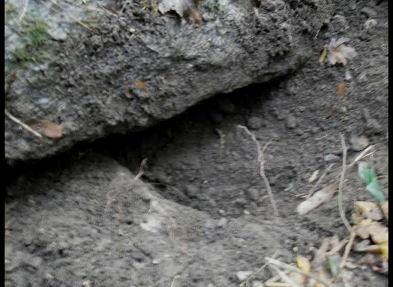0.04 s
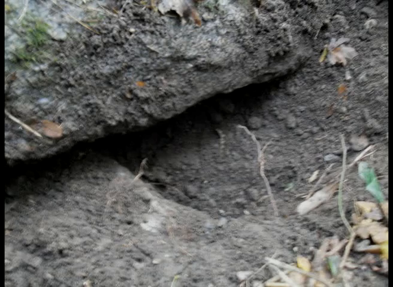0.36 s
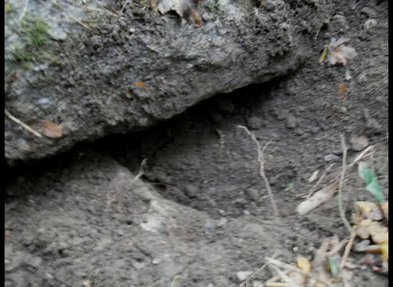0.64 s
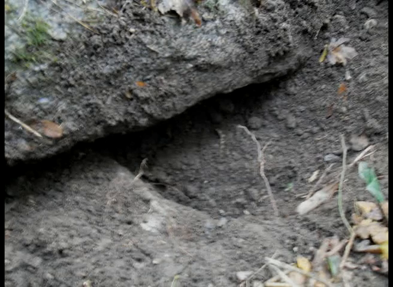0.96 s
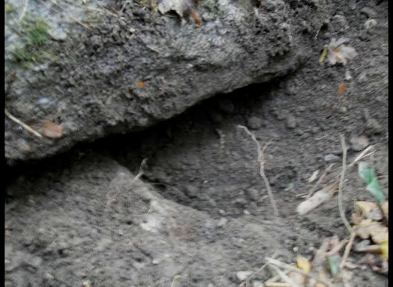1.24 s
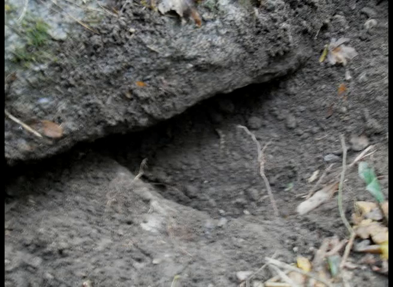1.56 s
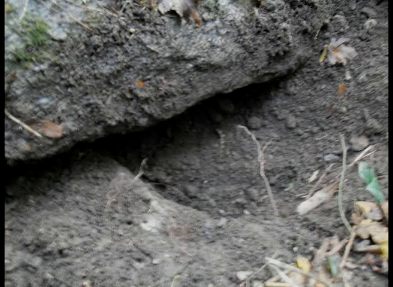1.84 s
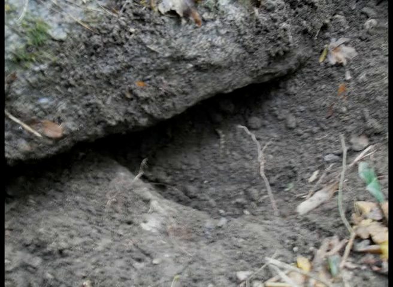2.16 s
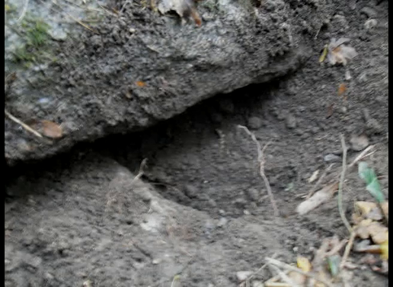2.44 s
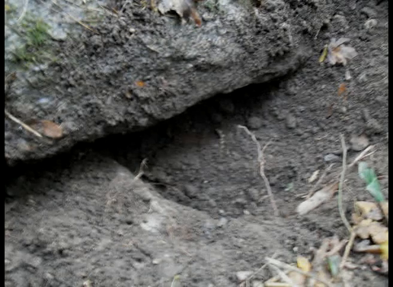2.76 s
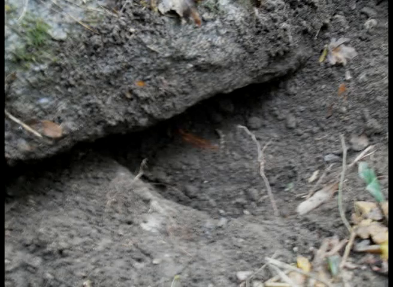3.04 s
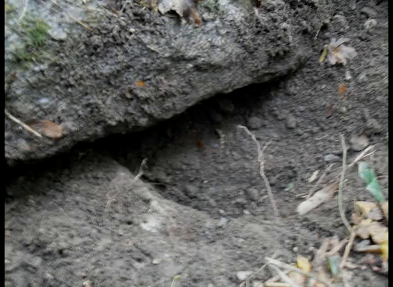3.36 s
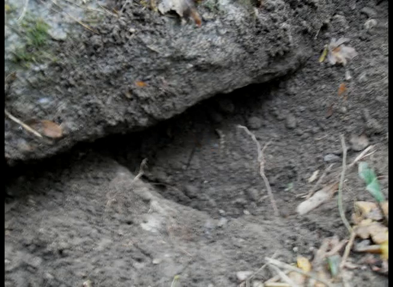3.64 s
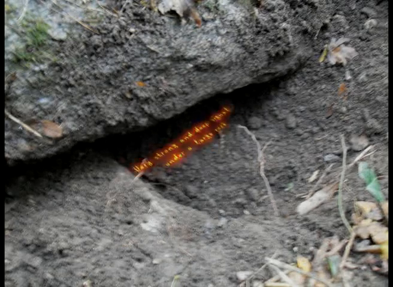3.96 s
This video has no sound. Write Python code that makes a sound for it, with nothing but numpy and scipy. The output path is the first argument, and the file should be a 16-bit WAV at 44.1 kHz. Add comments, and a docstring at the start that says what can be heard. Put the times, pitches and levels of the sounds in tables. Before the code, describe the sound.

Quiet hiss and small ticks, then a close insect's raspy buzz climbs in pitch.

```python
"""Outdoors, by a hole under a rock: soft hiss, faint scuffing, small ticks and a few far bird notes.
Near 3 s a loud, creaky buzz sets in close by, the way a dry contact sticks and slips. Each slip is an
impulse that rings one small, hard body near 3.3 kHz. The resonances stay put while the pulse rate
climbs, so separate double clicks merge into a rasp and then into a thin, rising whine."""
import sys
import numpy as np
from scipy import signal
from scipy.fft import rfft, irfft, next_fast_len
from scipy.io import wavfile
from scipy.ndimage import map_coordinates

SR = 44100
rng = np.random.default_rng(int(sys.argv[2]) if len(sys.argv) > 2 else 0)


def unload_wav(signal):
    """Save mono or channel-first audio to the path in sys.argv[1] as 16-bit WAV at rate SR, clipped to [-1, 1]."""
    wavfile.write(
        sys.argv[1],
        SR,
        np.round(np.clip(np.atleast_2d(signal).T, -1, 1) * 32767).astype(np.int16),
    )


N = 176400
TIME = np.arange(N) / SR


def amp(db):
    """Amplitude ratio of a level in decibels."""
    return 10 ** (np.asarray(db) / 20)


def unit(x):
    """Normalisation to unit RMS."""
    return x / np.sqrt(np.mean(x ** 2) + 1e-20)


def along(points, hz):
    """Interpolation of (f/Hz, value) points on a logarithmic frequency axis."""
    f, values = np.transpose(points)
    return np.interp(np.log(hz + 1), np.log(f + 1), values)


def curves(rows):
    """Linear interpolation in time: one curve for each column after t/s."""
    times, *columns = np.transpose(rows)
    return [np.interp(TIME, times, column) for column in columns]


def wobble(knots_per_s):
    """Smooth random modulation: a spline through Gaussian values."""
    knots = rng.standard_normal(int(N * knots_per_s / SR) + 4)
    return map_coordinates(knots, [TIME * knots_per_s])


def arch(start, length):
    """Envelope of one rounded rise and fall: the square root of a half sine."""
    progress = np.clip((TIME - start) / length, 0, 1)
    return np.sqrt(np.abs(np.sin(np.pi * progress)))


def coloured(x, spectrum, size=8192):
    """Minimum-phase filtering at unit energy; folding the cepstrum makes the response causal."""
    cepstrum = irfft(np.log(amp(along(spectrum, np.fft.rfftfreq(size, 1 / SR)))))
    cepstrum[1:size // 2] *= 2
    cepstrum[size // 2 + 1:] = 0
    response = irfft(np.exp(rfft(cepstrum)))
    return signal.fftconvolve(x, response / np.linalg.norm(response))[:N]


def pulses(times, sizes, order=8):
    """Band-limited impulses: windowed sincs place them between samples."""
    at = times[:, None] * SR
    taps = np.floor(at).astype(int) + np.arange(1 - order, order + 1)
    shape = np.sinc(taps - at) * np.cos(np.pi * (taps - at) / (2 * order)) ** 2
    return np.bincount(np.clip(taps, 0, N).ravel(), (sizes[:, None] * shape).ravel(), N + 1)[:N]


def reverberation(x, t60):
    """Diffuse field: convolution with exponentially decaying noise of unit energy."""
    t = TIME[:SR // 2]
    tail = rng.standard_normal(len(t)) * amp(-60 * t / t60)
    return signal.fftconvolve(x, tail / np.linalg.norm(tail))[:N]


def grains(spectrum, per_s=2500, spread_db=1.5):
    """Shot noise: dense, independent impacts of dry grains of uneven size."""
    hits = (rng.random(N) < per_s / SR) * rng.standard_normal(N)
    hits *= amp(spread_db * rng.standard_normal(N))
    return unit(coloured(hits, spectrum))


def air():
    """Filtered Gaussian noise: a nearly steady outdoor hiss."""
    # spectrum of the hiss: f/Hz, relative level/dB
    spectrum = [(25, -17.5), (60, -17), (100, -12.5), (170, -6), (300, -2), (500, -2.5), (850, -3),
                (1300, -4), (1700, -6.5), (2300, -8), (3200, -3.5), (4000, -5.5), (4600, -11.5),
                (6000, -10), (8000, -13), (10000, -16), (12000, -53)]
    level_db = -51.5 + 0.3 * wobble(14)
    return amp(level_db) * unit(coloured(rng.standard_normal(N), spectrum))


def birds(roughness=0.028):
    """Frequency-modulated tones: thin sliding notes, blurred by the reverberation of the woods."""
    # far bird notes: t/s, duration/s, start f/Hz, end f/Hz, direct peak level/dB
    notes = [(.335, 0.031, 4100, 3230, -56), (0.381, 0.029, 2920, 3210, -63),
             (0.516, 0.042, 4100, 4040, -54), (0.905, 0.052, 4120, 3980, -56),
             (1.111, .05, 3060, 3150, -62), (1.274, 0.096, 3190, 2944, -49.5),
             (1.368, 0.064, 3540, 3370, -53), (1.41, 0.076, 3160, 3100, -55),
             (1.659, 0.068, 3100, 3026, -49)]
    direct = np.zeros(N)
    for start, length, start_hz, end_hz, db in notes:
        glide_hz = np.interp(TIME, [start, start + length], [start_hz, end_hz])
        hz = glide_hz * (1 + roughness * wobble(400))
        direct += amp(db) * arch(start, length) * np.sin(2 * np.pi * np.cumsum(hz) / SR)
    return direct + amp(4) * reverberation(direct, t60=0.24)


def scuffing():
    """Granular friction: bright grit under a slowly changing pressure, and dull shuffles on soil."""
    # envelope of the grit: t/s, level/dB
    scuff = [(.05, -55.5), (.18, -48.5), (.23, -62.5), (.95, -84), (1.04, -53), (1.1, -60), (1.66, -58.5),
             (1.712, -42.5), (1.76, -51), (1.92, -56.5), (2.06, -46.5), (2.14, -53), (2.27, -49.5),
             (2.44, -49), (2.49, -45.5), (2.55, -47.5), (2.67, -48), (2.86, -63.5), (2.96, -44.5)]
    # soft shuffles: t/s, duration/s, greatest level/dB
    shuffles = [(.05, 0.18, -54.5), (0.46, 0.08, -61), (1.025, 0.092, -66.5), (1.28, 0.086, -66.5),
                (1.986, .14, -59), (2.42, 0.26, -65.5)]
    # spectra of grit and soil: f/Hz, relative level/dB
    grit = [(100, -21), (400, -11.5), (900, -7.5), (1200, -3), (1600, -6.5), (2000, -2), (2500, -8.5),
            (3100, 2.5), (3800, -2.5), (4600, -16.5), (5800, -4.5), (7300, -22), (10000, -15)]
    soil = [(100, -13.5), (400, -8.5), (780, 10), (1000, -17), (1200, 7), (1700, -17), (4000, -34.5)]
    grit_db, = curves(scuff)
    shuffling = sum(amp(db) * arch(start, length) for start, length, db in shuffles)
    return amp(grit_db) * grains(grit) + shuffling * grains(soil)


def ticks(snap=4.8):
    """Band-limited transients: each is the snap of first contact and an exponentially dying crumble."""
    # small ticks: t/s, peak level/dB, centre f/Hz, half-width/octaves, T60/s
    contacts = [(.075, -39.5, 850, 0.77, 0.06), (.124, -37, 3000, 1.4, .02),
                (.157, -29.5, 3300, 2.2, 0.018), (.175, -32, 1500, 1.6, 0.016),
                (0.206, -27, 3670, 1.6, 0.019), (0.3052, -31, 1490, 0.65, .016),
                (0.4, -39, 1710, 0.84, 0.013), (1.041, -31, 2850, 1.07, 0.022),
                (1.171, -23.5, 1850, 1.02, 0.0062), (1.222, -33.5, 3140, 0.58, 0.013),
                (1.87, -28, 2900, 1.8, 0.015), (2.057, -28, 3430, 0.78, 0.03),
                (2.063, -28.5, 3450, 0.36, .022), (2.225, -40, 467, 0.83, 0.023),
                (2.389, -32.5, 2100, 0.7, 0.024), (2.477, -25, 2470, 0.64, 0.023),
                (2.573, -36, 2680, 1, 0.0094), (2.801, -27.5, 1660, 0.55, 0.0096),
                (3.274, -28.5, 7960, 0.51, 0.0038), (3.3796, -15, 6400, 0.37, 0.0026),
                (3.54, -30.5, 1050, 0.7, 0.012), (3.614, -25.5, 9160, 0.37, 0.0089)]
    out, t = np.zeros(N + SR), TIME[:SR // 20]
    f = np.geomspace(20, SR / 2, 80)
    for start, db, hz, octaves, t60 in contacts:
        band_db = -20 * np.log10(1 + (np.log2(f / hz) / octaves) ** 4)
        push = (rng.standard_normal(len(t)) + snap * (t == 0)) * amp(-60 * t / t60)
        burst = coloured(push, np.column_stack([f, band_db]))
        out[round(start * SR):][:len(burst)] += amp(db) * burst / np.abs(burst).max()
    return out[:N]


def squeak(roughness=0.031):
    """Random frequency modulation roughens a brief upward glide on top of the buzz."""
    # course of the squeak: t/s, f/Hz, level/dB
    glide = [(3.82, 1080, -53), (3.827, 1205, -38), (3.838, 1776, -33), (3.845, 1840, -38),
             (3.852, 1670, -46), (3.859, 1990, -30), (3.866, 2250, -60)]
    hz, db = curves(glide)
    phase = 2 * np.pi * np.cumsum(hz * (1 + roughness * wobble(830))) / SR
    sounding = (TIME > glide[0][0]) & (TIME < glide[-1][0])
    return sounding * amp(db) * unit(np.sin(phase))


def stick_slip(waver=0.007, flutter_db=1, scatter_db=1.2, friction_db=-13):
    """Relaxation oscillation: slip pulses, paired and uneven when slow, single and regular when fast."""
    # rate of slipping: t/s, f/Hz
    slip_rate = [(2.9705, 30.27), (2.99, 98.1), (3.02, 115.6), (3.065, 153.7), (3.095, 148.2),
                 (3.12, 119.8), (3.17, 124.5), (3.2, 149), (3.24, 207.9), (3.275, 299.3), (3.3, 385.3),
                 (3.32, 440.2), (3.342, 444), (3.358, 465.9), (3.37, 445), (3.386, 440.2), (3.402, 423.6),
                 (3.423, 409), (3.44, 393.2), (3.47, 394.6), (3.49, 364), (3.52, 360.1), (3.55, 402.8),
                 (3.58, 459), (3.6, 503.7), (3.622, 559), (3.64, 649), (3.675, 684), (3.69, 660),
                 (3.71, 668.5), (3.725, 657), (3.78, 663), (3.815, 692), (3.84, 727), (3.862, 767),
                 (3.882, 772), (3.893, 809.6), (3.912, 840), (3.96, 1012), (4, 1019)]
    # strength of the drive: t/s, level/dB
    force = [(2.97, -36.5), (3.11, -36), (3.17, -38.5), (3.29, -33.5), (3.33, -34), (3.355, -32.5),
             (3.385, -37.5), (3.41, -34.5), (3.465, -35), (3.55, -33), (3.61, -34), (3.65, -34),
             (3.73, -36.5), (3.81, -33), (3.83, -33), (3.865, -31.5), (3.886, -38), (3.905, -36),
             (3.925, -35.5), (3.95, -33), (4, -30.5)]
    # timing scatter against slip rate: f/Hz, standard deviation/periods
    jitter = [(60, 0.027), (200, .035), (310, 0.028), (390, 0.011), (650, 0.0029), (1000, 0.0055)]
    rate_hz, = curves(slip_rate)
    force_db = curves(force)[0] + flutter_db * wobble(44.8)
    sliding = TIME >= slip_rate[0][0]
    cycles = np.cumsum(sliding * rate_hz * (1 + waver * wobble(170))) / SR
    times = np.interp(np.arange(int(cycles[-1]) + 1), cycles[sliding], TIME[sliding])  # one slip a cycle
    hz = np.interp(times, TIME, rate_hz)
    time_draw, size_draw, lag_draw = rng.standard_normal((len(times), 3)).T
    sizes = amp(np.interp(times, TIME, force_db) + scatter_db * size_draw)
    sizes *= np.sqrt(SR / np.maximum(hz, 99))  # power is independent of rate above 99 Hz
    times += time_draw * along(jitter, hz) / hz
    rebound = 0.7 / (1 + (hz / 290) ** 6)  # the second pulse fades out around 290 Hz
    rebound_lag_s = 0.00213 + 0.00007 * lag_draw
    sizes /= np.hypot(1, rebound)  # a pair shares the energy of one slip
    slips = pulses(times, sizes) + pulses(times + rebound_lag_s, sizes * rebound)
    friction_noise = sliding * amp(force_db + friction_db) * rng.standard_normal(N)
    return slips + friction_noise


def buzz():
    """Forced resonance: the slips ring a small, hard body, and the hollow adds a short reverberation."""
    # resonances of the body: f/Hz, relative level/dB
    resonances = [(100, -57.5), (400, -26.5), (700, -27.5), (980, -15.5), (1180, -24.5), (1400, -16.5),
                  (1680, -17.5), (1950, -10.5), (2250, -23), (2480, -14.5), (2700, -10), (2950, -4.5),
                  (3120, -6.5), (3260, 0.5), (3420, -2.5), (3620, -14), (3950, -19.5), (4300, -35.5),
                  (4800, -43), (5400, -28), (5800, -12), (6250, -23.5), (6650, -14.5), (7100, -24.5),
                  (7600, -29.5), (10000, -50.5)]
    body = coloured(stick_slip(), resonances)
    return body + amp(-14) * reverberation(body, t60=0.06)


def scene():
    """Superposition of all sources in one channel."""
    return (buzz() + squeak() + ticks() + birds() + scuffing() + air())[None]


def record(dry, start_s=0.047, top_hz=10150):
    """Gating and ideal low-pass filtering: a moment of silence first, and no treble above the limit."""
    size = next_fast_len(N + SR // 2)
    gated = dry * (TIME > start_s)
    passband = np.fft.rfftfreq(size, 1 / SR) < top_hz
    return irfft(rfft(gated, size) * passband, size)[..., :N]


dry = scene()
out = record(dry)
unload_wav(out)
```